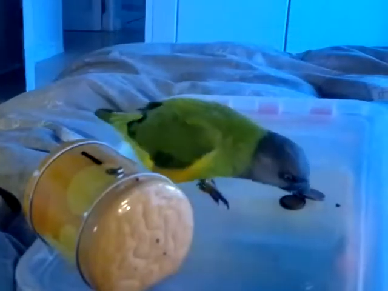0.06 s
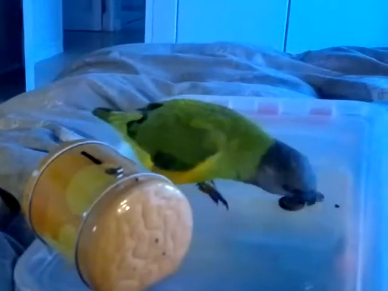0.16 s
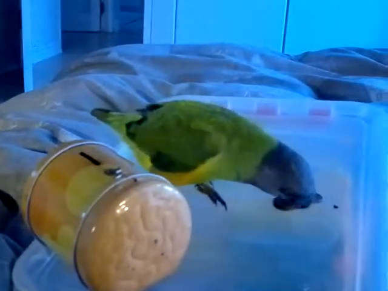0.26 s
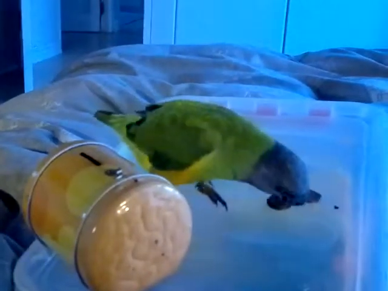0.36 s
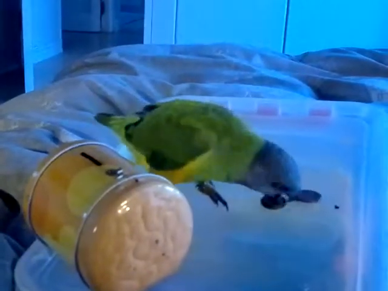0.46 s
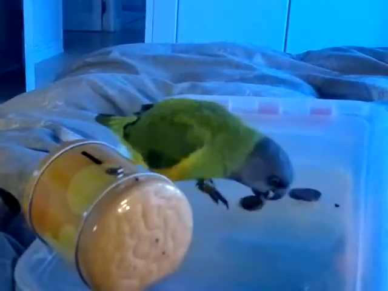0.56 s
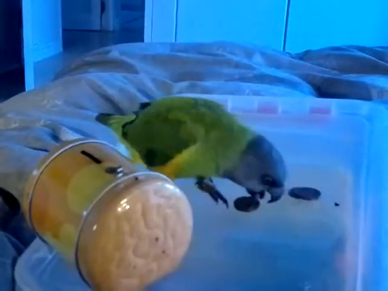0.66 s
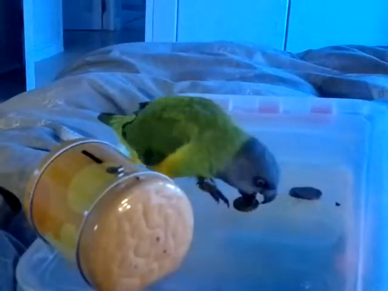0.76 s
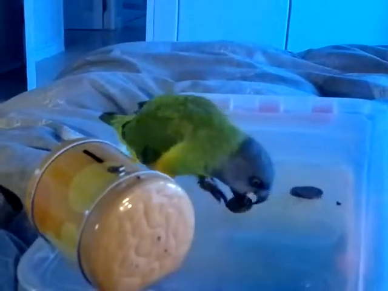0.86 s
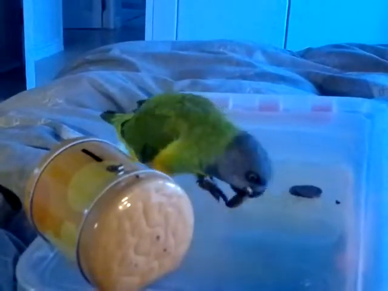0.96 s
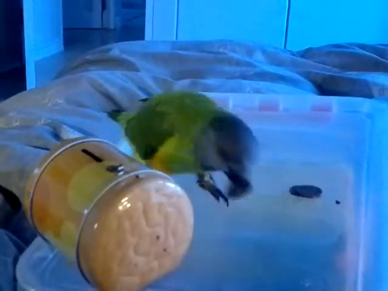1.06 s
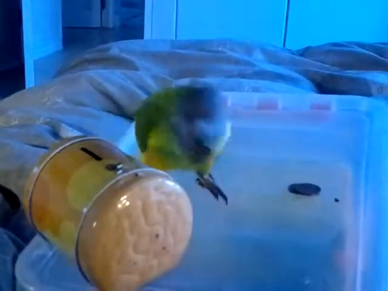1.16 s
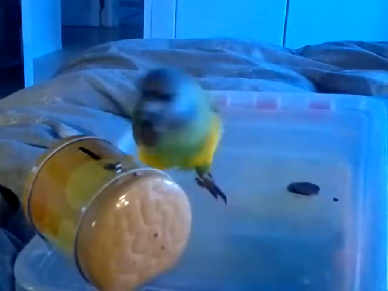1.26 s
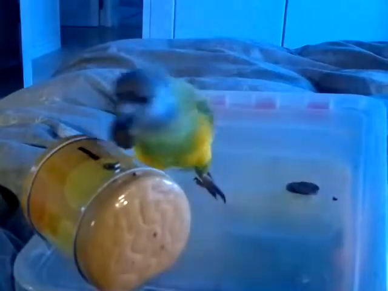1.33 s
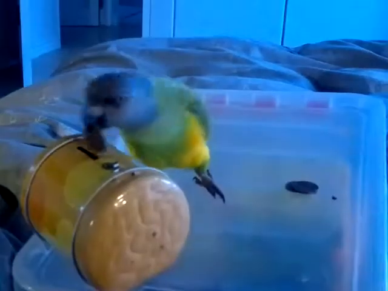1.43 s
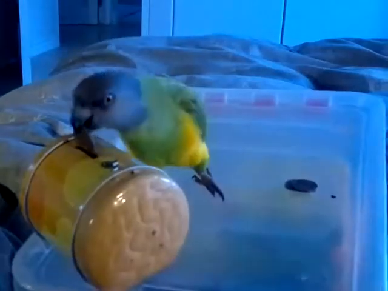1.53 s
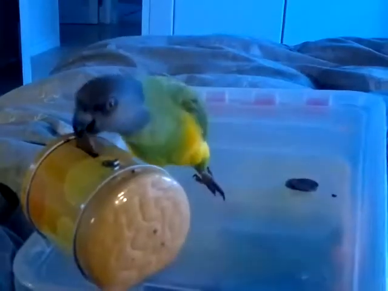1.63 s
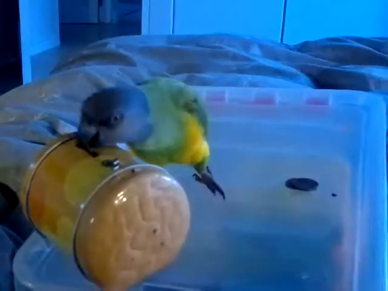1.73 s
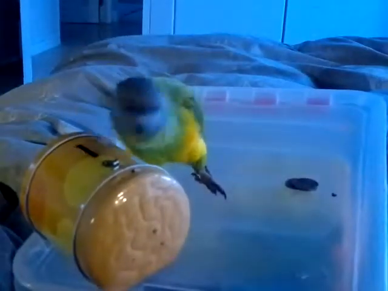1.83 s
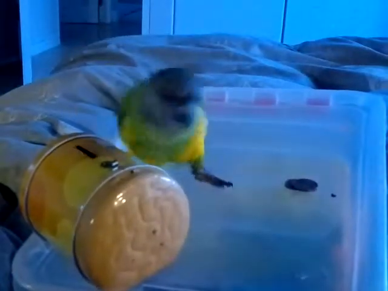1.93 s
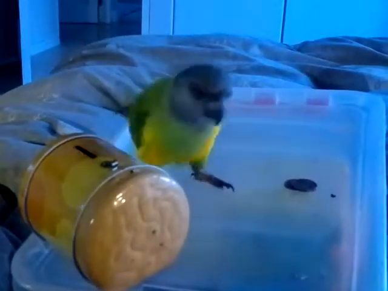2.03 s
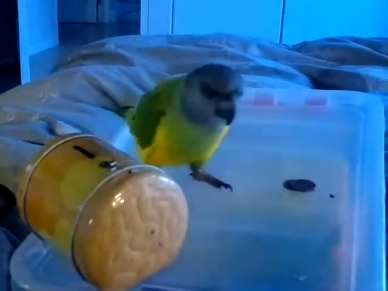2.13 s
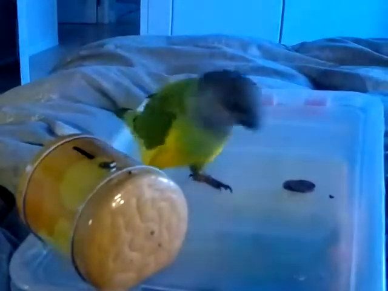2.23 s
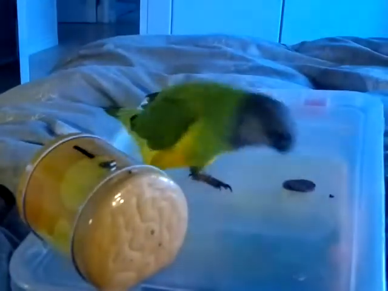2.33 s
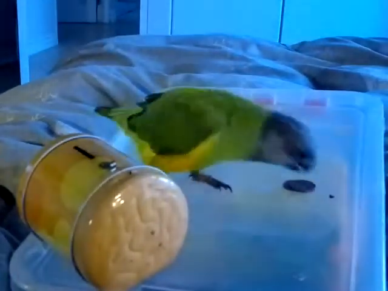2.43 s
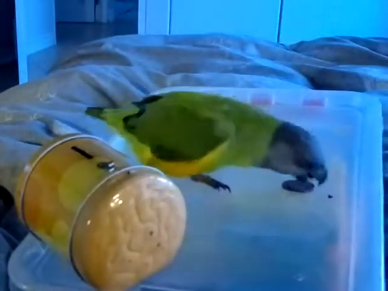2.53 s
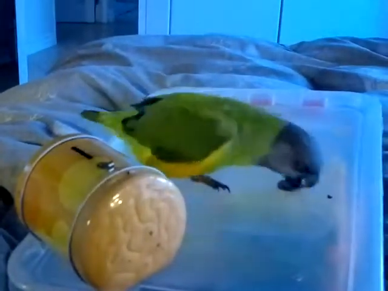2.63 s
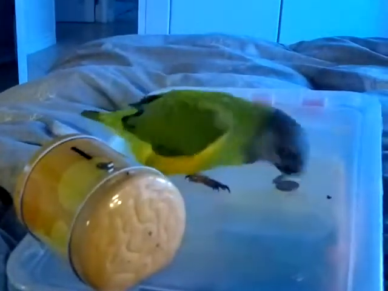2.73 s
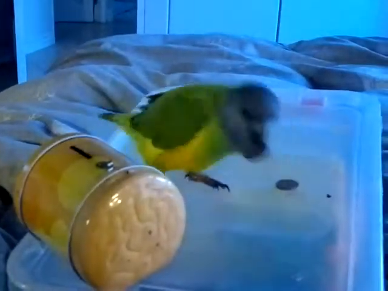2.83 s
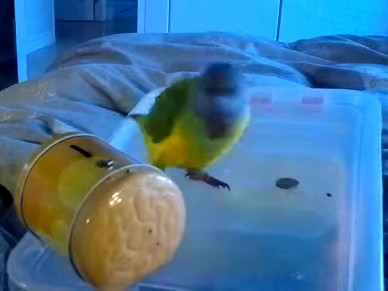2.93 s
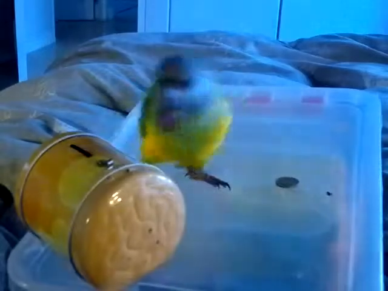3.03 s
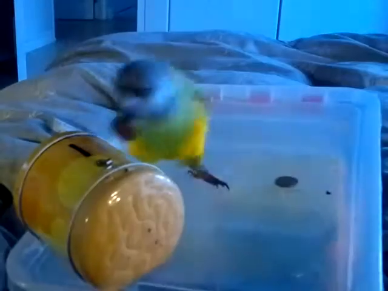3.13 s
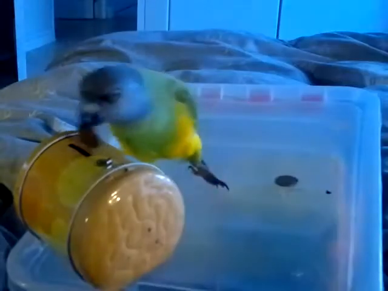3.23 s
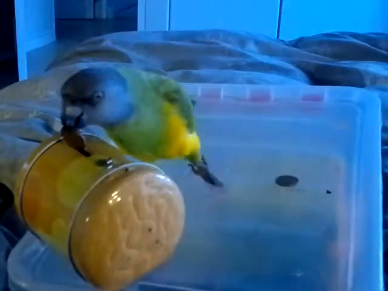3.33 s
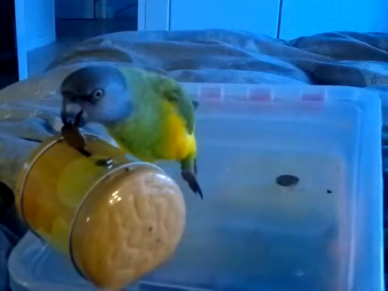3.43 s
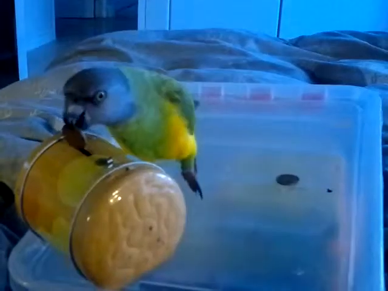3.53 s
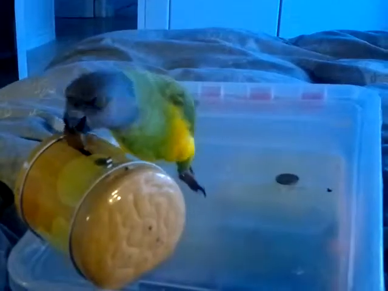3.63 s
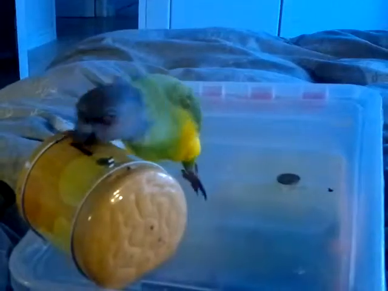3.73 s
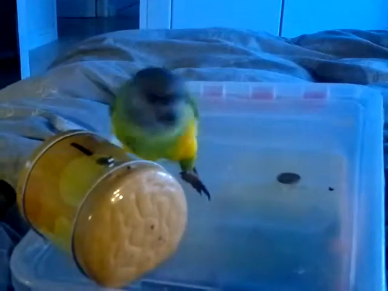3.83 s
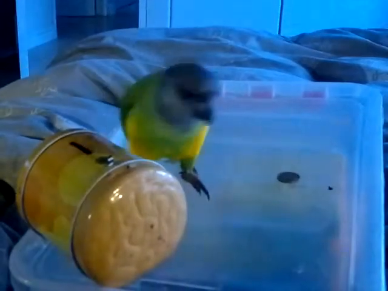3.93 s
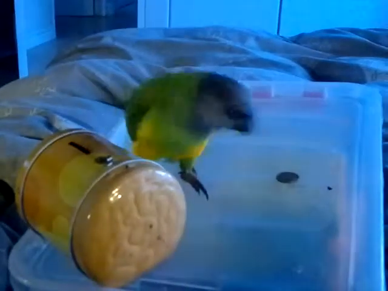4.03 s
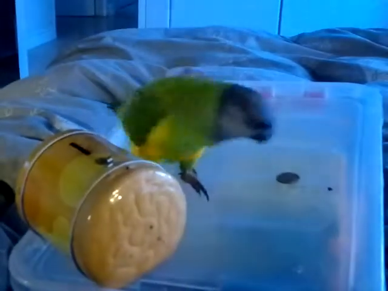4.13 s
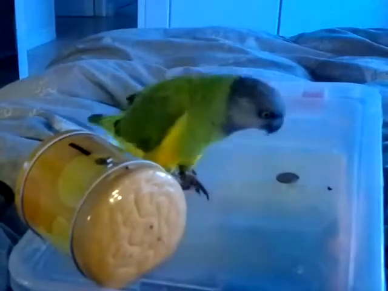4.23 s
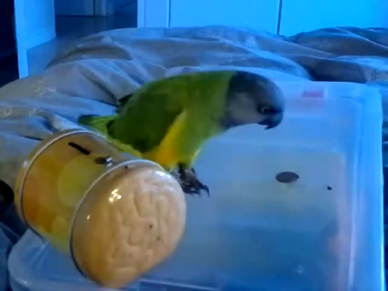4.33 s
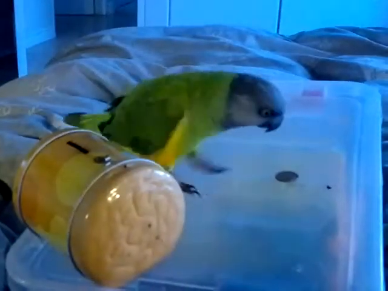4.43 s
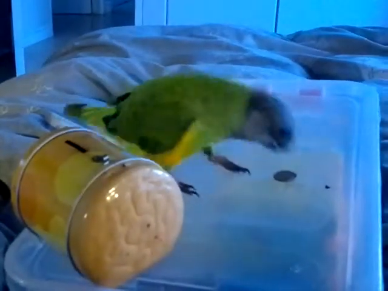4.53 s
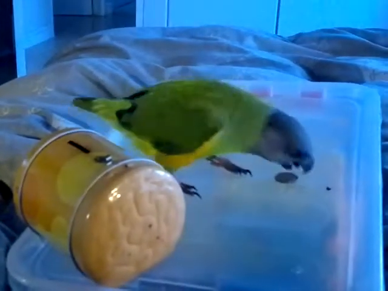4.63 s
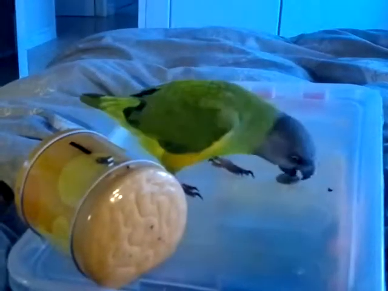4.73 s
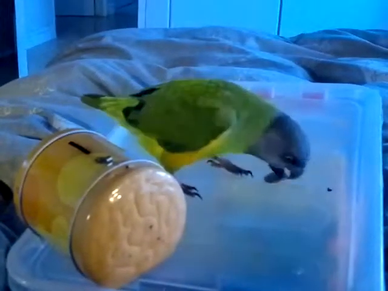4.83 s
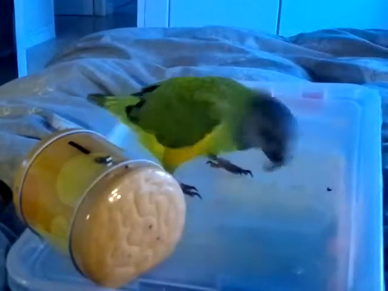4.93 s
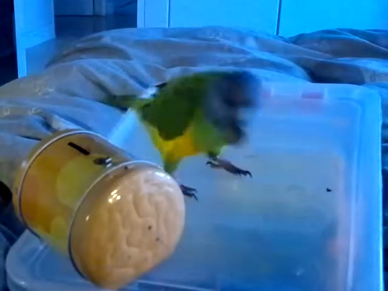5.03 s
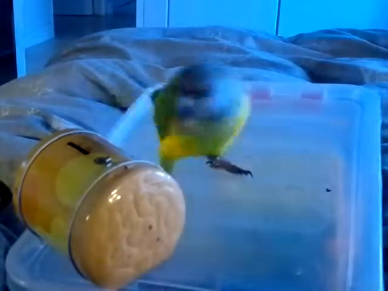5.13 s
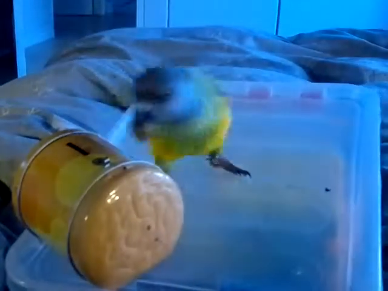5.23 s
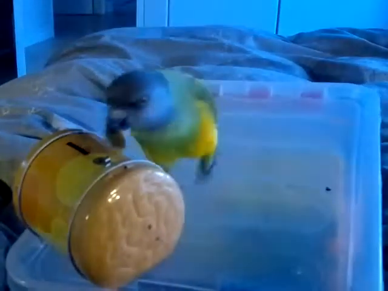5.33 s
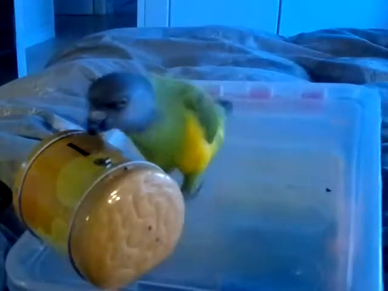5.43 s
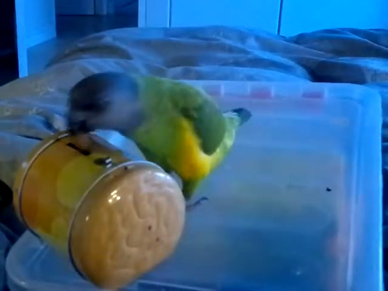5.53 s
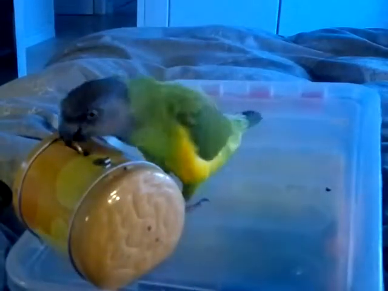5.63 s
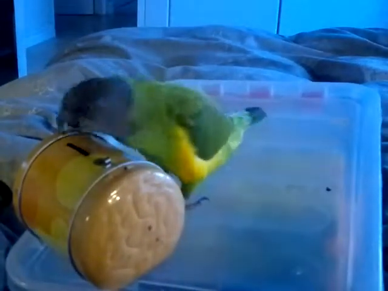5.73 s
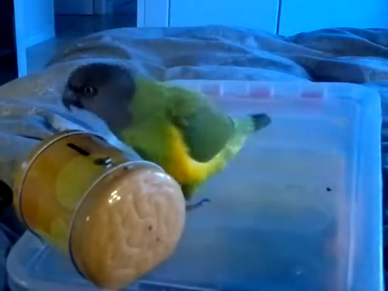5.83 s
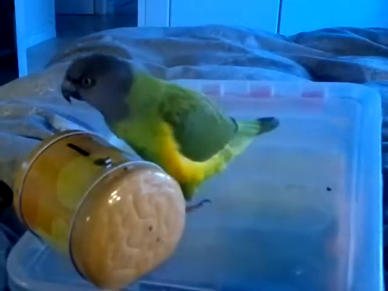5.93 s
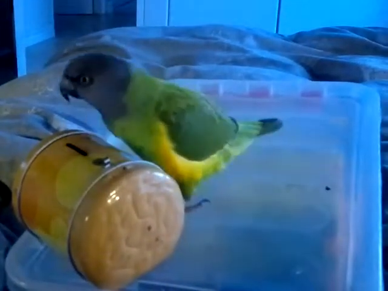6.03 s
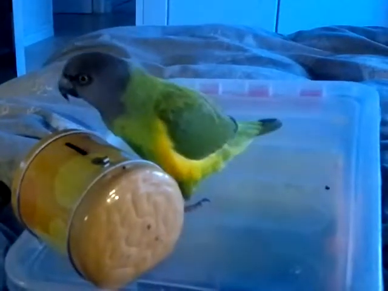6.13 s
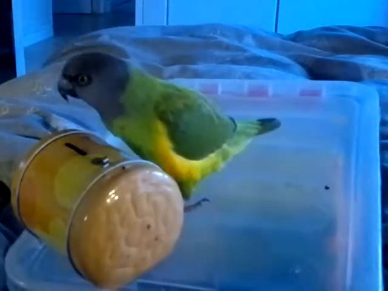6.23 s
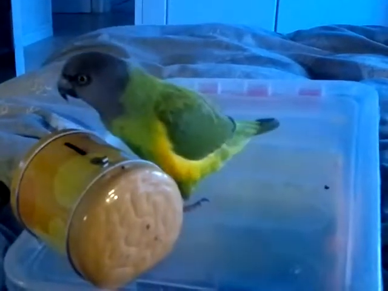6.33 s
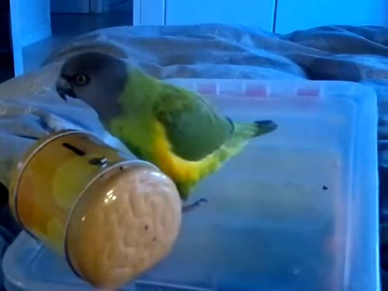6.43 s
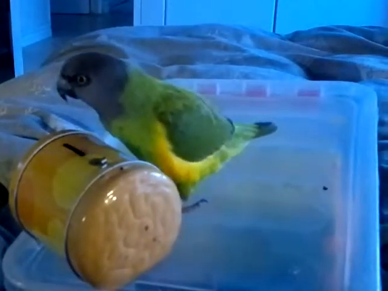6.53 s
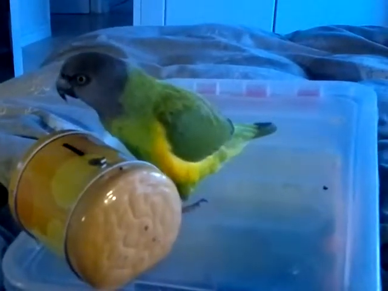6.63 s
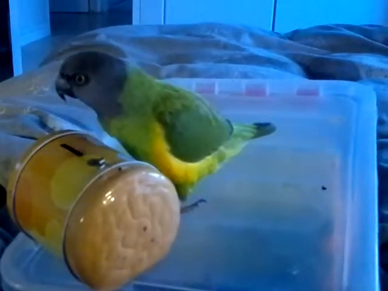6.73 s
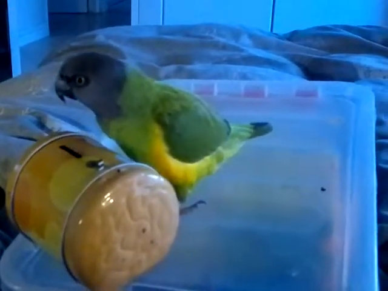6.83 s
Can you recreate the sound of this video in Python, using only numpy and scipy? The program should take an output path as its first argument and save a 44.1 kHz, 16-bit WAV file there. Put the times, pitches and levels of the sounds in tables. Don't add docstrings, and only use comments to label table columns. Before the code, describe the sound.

Close up in a small soft room, a parrot noses a coin over a plastic tub lid with dry clicks and short scrapes. It taps and grinds the coin along a tin's slot in thin bright clinks, then the coin drops and chatters on others over a hollow boom. Two more coins follow, the second pickup nearly silent. Faint hiss and low gusty air, mainly on the left, lie beneath.

```python
import sys
import numpy as np
from scipy import signal
from scipy.fft import rfft, irfft, next_fast_len
from scipy.io import wavfile
from scipy.ndimage import uniform_filter1d

SR = 44100
rng = np.random.default_rng(int(sys.argv[2]) if len(sys.argv) > 2 else 0)


def unload_wav(signal):
    wavfile.write(
        sys.argv[1],
        SR,
        np.round(np.clip(np.atleast_2d(signal).T, -1, 1) * 32767).astype(np.int16),
    )


def ratio_of_db(decibels):
    return 10 ** (np.asarray(decibels, float) / 20)


N = 303408
SPOTS, BLOCK = 16, 256
FADE_DB, LAST = 20, 1.25

# (time [s], level [dB rms])
RUMBLE = [(0.0, -41), (0.09, -49), (0.94, -57), (1.05, -43), (1.38, -54), (1.8, -42), (2.05, -58),
          (2.34, -40.5), (2.37, -51), (3.43, -55), (3.49, -47), (3.7, -59.5), (3.77, -38.5), (3.87, -52.5),
          (4.81, -47), (5.34, -56), (5.36, -46), (6.88, -57.5)]
# (time [s], level [dB rms])
HISS = [(0, -73), (1.2, -75), (2.1, -78.5), (3, -75), (4.2, -72.5), (5.1, -73.5), (6.2, -76.5),
        (6.88, -70.5)]
# (frequency [Hz], density [dB per Hz])
RUMBLE_COLOUR = [(15, -8.5), (30, 5), (60, -3.5), (120, -17.5), (220, -25.5), (400, -41.5), (800, -64.5)]
# (frequency [Hz], density [dB per Hz])
HISS_COLOUR = [(88, -23), (150, -3), (205, -20.5), (235, -5), (398, -14), (1400, -21.5), (2650, -24.5),
               (16000, -39.5)]
# (frequency [Hz], T60 [s], share common to both ports [0-1])
ROOM = [(150, 0.18, 0.8), (600, 0.11, 1), (1500, 0.2, 0.9), (3992, 0.22, 0.05), (9990, 0.14, 0.05)]
# (frequency [Hz], level difference [dB])
LID_BALANCE = [(150, 7), (700, 5), (1200, 1), (1800, 3), (2600, 10), (4400, 17.5), (8100, -10),
               (15000, -18.5)]
# (frequency [Hz], level difference [dB])
TIN_BALANCE = [(100, 3), (400, 1), (700, 2.5), (1300, -1.5), (2400, 4.5), (4400, -0.5), (8100, -13),
               (15000, -21.5)]
# (frequency [Hz], phase lead [rad])
PORT_LEAD = [(20, 0), (1150, 0.62), (1480, -1.6), (1750, -2), (3100, -4.5), (3800, -1), (5200, 3),
             (16000, 16.5)]

# (frequency [Hz], width [Hz], level [dB])
LID_CLICK = [(1631, 400, -2.5), (2262, 450, 4.5), (2940, 650, 1), (3780, 580, -3), (4420, 1000, -12.5)]
# (frequency [Hz], width [Hz], level [dB])
LID_PANEL = [(124, 214, 3.5), (214.3, 11, 4), (242.5, 35, -5.5), (391.4, 12.3, -7.5)]
# (frequency [Hz], width [Hz], level [dB])
LID_SKIN = [(643, 128, 0), (1049, 130, 7), (1530, 980, -3)]
# (frequency [Hz], width [Hz], level [dB])
LID_EDGE = [(5540, 1200, 7.5), (10600, 3100, -11.5)]
# (frequency [Hz], width [Hz], level [dB])
TIN_WALL = [(1659, 540, -6.5), (2095, 630, -4), (2400, 220, -3.5), (2735, 200, -4.5), (3001, 90, -0.5),
            (3240, 200, -2.5), (3627, 250, 2), (3805, 350, -2), (4366, 230, -4), (4898, 540, -8),
            (5470, 700, -10), (5820, 410, -8.5)]
# (frequency [Hz], width [Hz], level [dB])
TIN_DRUM = [(115, 35, -7), (236.2, 84, -10), (415.9, 59, -7), (592, 140, -4.5), (667, 70, 0),
            (721, 90, 2.5), (932, 490, -3), (1182.4, 230, -1.5)]
# (frequency [Hz], width [Hz], level [dB])
TIN_BUMP = [(135, 78, -6.5), (279, 26, -3.5), (410, 15, -9.5)]
# (frequency [Hz], width [Hz], level [dB])
TIN_RIM = [(932, 56, -16.5), (1142, 250, -6.5), (1177, 130, -4.5), (1511, 280, -12)]
# (frequency [Hz], width [Hz], level [dB])
COIN_JINGLE = [(6300, 1900, 7.5), (7405, 700, 0.5), (7600, 320, 1), (9480, 1100, -3), (10250, 700, -2.5),
               (10900, 600, -7.5), (12400, 540, -6.5), (13900, 500, -7), (14800, 690, -6),
               (15800, 600, -14)]

# (time [s], click [dB], weight of the push [dB],
# sharpness [dB])
LID_TAPS = [(0.1047, -63.5, 11, -5), (0.1299, -31, -1, -5), (0.19, -55, 12, 24), (0.197, -42, -9, -38),
            (0.2047, -27.5, -16, -46), (0.26, -72, 0, -5), (0.2918, -23.5, -11, 14),
            (0.3034, -18, -25, -13), (0.3094, -18, -9, -25), (0.3264, -45, -7, -24),
            (0.3494, -30, -26.5, -53), (0.4229, -49, 6, -35), (0.4362, -20.5, -14.5, -8),
            (0.4835, -24.5, -23, -30), (0.4985, -24.5, -21, -30), (0.5246, -44.5, 0, -39),
            (0.628, -40, 6, 11), (0.6597, -38.5, 1, -30), (0.7788, -41, 5.5, -40),
            (0.8304, -48.5, 3, -22), (0.8855, -49, -8, -25.5), (0.9174, -66, -17, -20),
            (2.487, -51.5, 1.5, -13.5), (2.506, -31, -1, 18.5), (2.5197, -34.5, -3, -39),
             (2.529, -24, -10.5, -39), (2.544, -33, -30, -32), (2.5554, -29, -27, -35.5),
             (2.562, -25, -33, -41), (2.589, -35, -3, -28), (2.5999, -18.5, -13.5, -15),
             (2.6041, -24, -7.5, -35.5), (2.6248, -23.5, -10, -32), (2.6288, -12.5, -31, -32),
             (2.6367, -20.5, -28, -35), (2.6395, -29, -27.5, -42), (2.962, -49.5, -34.5, 18),
             (4.477, -44, -33.5, 0), (4.6498, -44.5, 16, -10.5), (4.6535, -27.5, -13.5, 12),
             (4.6717, -46.5, 17.5, -36), (4.7683, -32, -20.5, -46), (4.84, -48, -18, -25.5),
             (3.488, -56.5, -25, -25.5), (5.172, -54.5, -15.5, -21)]
# (peak time [s], fade [s], rasp [dB rms], weight [dB], sharpness [dB])
LID_DRAGS = [(.19, 0.036, -50.5, 0, -25), (.206, 0.04, -48, -3.5, -36), (.308, 0.054, -36, -14.5, -6),
             (.38, 0.068, -65, 20, -30), (.42, 0.056, -55.5, 6, -30), (.45, 0.13, -47, 8, -53),
             (.497, 0.033, -44, -2.5, -52), (.634, 0.024, -61.5, 21.5, -6), (.666, 0.063, -66.5, 25.5, -23),
             (.762, 0.028, -54.5, -2, -33), (.782, 0.023, -59, 20, -34), (.9, 0.022, -66.5, 12, -24),
             (2.515, 0.39, -60, 5.5, -14), (2.552, 0.011, -43, -11, -30), (2.606, 0.06, -42, 5, -13),
             (2.638, 0.011, -44.5, -4, -9), (4.662, 0.11, -60.5, 11, -11.5),
             (4.772, 0.037, -48.5, -11.5, -50), (4.79, 0.018, -63, -3, -49), (4.815, 0.028, -61, -4, -51)]
# (time [s], clink [dB], weight [dB], sharpness [dB])
SLOT_TAPS = [(1.2975, -25, -6.5, -7.5), (1.3173, -18, -30, -24.5), (1.4061, -33.5, -31, -26),
             (1.4305, -16.5, -31, -22), (1.4424, -12, -33, -17), (1.5549, -10, -29, -29),
             (1.5699, -21.5, -16, -26.5), (1.5913, -36, -37.5, -32), (1.643, -9, -28.5, -30.5),
             (1.6576, -17, -35.5, -22.5), (3.1317, -22, -18, -12.5), (3.1481, -17.5, -35.5, -26.5),
             (3.247, -10, -37, -18.5), (3.3136, -31, -21, -25), (3.4081, -46.5, -9, -30.5),
             (3.57, -11, -45, -20.5), (3.5848, -34.5, -38, -25.5), (3.6083, -6.5, -38.5, -19),
             (3.6416, -22, -44.5, -29.5), (5.2453, -43, -40, -2), (5.3068, -21.5, -30, -17),
             (5.3202, -20, -42, -15), (5.3787, -37, -23.5, -49), (5.5181, -19, -66.5, -14.5),
             (5.531, -13, -59, -12.5), (5.6101, -16.5, -45, -39), (5.6283, -17.5, -37.5, -26.5),
             (5.6446, -23.5, -45.5, -14.5), (6.1587, -37.5, -21.5, -15), (6.1764, -40.5, -28, -41),
             (1.324, -15.5, -35, -24.5), (1.332, -29.5, -27, -23), (1.456, -23.5, -41, -19.5),
              (1.465, -22, -37, -21.5), (1.52, -36.5, -18, -37), (1.536, -23, -39, -37.5),
              (1.544, -20.5, -43, -33), (1.56, -13, -37, -29.5), (1.581, -21, -37, -14.5),
              (1.603, -20, -38, -20), (1.63, -19, -48, -24), (1.647, -9, -31.5, -19.5),
              (1.6572, -10.5, -40, -21), (3.159, -23, -26.5, -26), (3.175, -30.5, -11, -30.5),
              (3.187, -33.5, -28, -35), (3.263, -19, -43, -9), (3.562, -24.5, -31, -19.5),
              (3.602, -19, -40, -19.5), (5.326, -25, -39, -16.5), (5.335, -37, -40, -21),
              (5.357, -36, -38, -29), (5.394, -38.5, -36, -33.5), (5.407, -35.5, -32, -44),
              (5.418, -33.5, -24, -42), (5.485, -47, -14, -30), (5.537, -16.5, -55, -21),
              (5.546, -27, -72, -22), (5.638, -18.5, -40, -26), (5.659, -26.5, -39, -20.5)]
# (peak time [s], fade [s], grind [dB rms], weight [dB], sharpness [dB])
SLOT_GRINDS = [(1.545, 0.082, -28, -36, -33), (1.574, 0.13, -23.5, -30, -13.5),
               (1.656, .035, -21.5, -22, -9.5), (3.175, 0.038, -42, 0, -37.5),
               (3.235, 0.024, -40, -14, -17.5), (3.572, 0.13, -23.5, -33, -16.5),
               (3.638, 0.026, -20, -25, -10), (5.338, 0.11, -37, -20, -43.5),
               (5.4, 0.032, -35, -8.5, -56.5), (5.622, 0.069, -32.5, -32, -32.5),
               (5.647, 0.014, -22.5, -25, -13)]
# (time [s], clink
# [dB], weight [dB], sharpness [dB])
TIN_HITS = [
    (1.7428, -3.5, -13.5, -14.5),
    (1.8255, -6.5, -4, -11.5),
    (3.7571, -8, -9.5, -9),
    (3.9, -18, -9.5, -14.5),
    (4.012, -18.5, -6.5, -16),
    (4.0475, -18.5, -3.5, -12),
    (5.7415, -8.5, -12.5, -11.5),
    (5.8085, -5, -7.5, -7.5),
    (5.9329, -5.5, -18, -9.5),
            (1.7483, -5, -20.5, -21.5), (1.7577, -2.5, -6, -10.5), (1.7679, -10.5, -11.5, -5),
                 (1.7791, -8, -14.5, -9), (1.7871, -6, -15.5, -8), (1.7956, -9.5, -10, -7),
                 (1.808, -5, -18.5, -13.5), (1.8125, -5.5, -13, -16), (1.8308, -11, -2.5, -10.5),
                 (1.8414, -13.5, -13, -10), (1.863, -13, -9, -14), (1.8752, -20.5, -5.5, -11),
                 (1.8915, -14.5, -12.5, -11.5), (1.8982, -11.5, -12, -14), (1.9092, -13.5, -11.5, -7),
                 (1.9164, -14.5, -13.5, -9.5), (1.9286, -21.5, -11.5, -9), (1.9439, -18.5, -9.5, -6),
                 (1.9518, -15, -9.5, -8.5), (1.964, -27, -10.5, -9.5), (1.9714, -30.5, -5.5, -13),
                 (1.9788, -25.5, -19.5, -13.5), (1.9869, -24.5, -10, -15.5), (1.9944, -28.5, -7, -15),
            (3.7421, -5.5, -9, -9), (3.7547, -10, -10, -10.5), (3.759, -2, -3, -9.5),
                  (3.7687, -11.5, -7, -6.5), (3.7786, -9.5, -10.5, -4.5), (3.7985, -14.5, -5.5, -6.5),
                  (3.8079, -4, -9.5, -3), (3.8226, -12.5, -9.5, -11), (3.8314, -4.5, -17.5, -11),
                  (3.8384, -8, -15, -9), (3.8499, -14, -8.5, -14), (3.874, -12.5, -4, -10),
                  (3.8813, -12, -12.5, -16), (3.905, -9, -11, -20.5), (3.9118, -16, -4.5, -12),
                  (3.9227, -13, -17, -5), (3.9536, -13, -11, -18), (3.963, -13.5, -20, -17),
                  (3.9895, -21, -15, -19.5), (4.0008, -26.5, -15, -30), (4.0154, -3.5, -15.5, -11.5),
                  (4.0536, -18, -14.5, -5), (4.0614, -23, -12.5, -9), (4.0754, -17.5, -13, -10),
                  (4.0858, -20.5, -21.5, -16),
            (5.7449, -7.5, -5.5, -12.5), (5.7513, -13.5, -6, -10.5), (5.762, -7.5, -5, -10),
                 (5.7757, -10, -7, -8.5), (5.7857, -6, -11, -12), (5.7954, -8, -7.5, -10),
                 (5.817, -6.5, -11.5, -3), (5.8328, -13.5, -15.5, -4.5), (5.8496, -9, -12.5, -12.5),
                 (5.8578, -18.5, -9, -10.5), (5.8944, -30.5, -6.5, -12.5), (5.908, -32, -7.5, -15.5),
                 (5.9167, -35, -4, -12), (5.9393, -8, -15.5, -13.5), (5.9501, -12.5, -12, -10),
                 (5.964, -18.5, -13.5, -7), (5.9711, -12, -14.5, -14), (5.9776, -23.5, -18.5, -9),
                 (6.019, -30, -11, -11.5), (6.0255, -24, -15, -9.5), (6.0344, -30.5, -14, -11.5)]
# (peak time [s], fade [s], rattle [dB rms], weight [dB])
TIN_RATTLES = [(1.746, 0.038, -17, 7), (1.787, 0.11, -13, -21), (1.813, 0.19, -15.5, -9.5),
               (3.746, 0.12, -12.5, -18.5), (3.81, .16, -15, -12), (3.876, 0.14, -21, -8),
               (3.955, 0.028, -28.5, -8), (4.013, 0.028, -5, -19.5), (4.03, 0.11, -19.5, -6),
               (5.746, 0.023, -18, 5.5), (5.757, 0.13, -8.5, -10), (5.848, 0.04, -17, -19.5),
               (5.94, 0.0087, -12, -5.5), (5.956, 0.11, -20.5, -13.5)]


def on_log(table, hz, axis=1):
    t = np.array(table, float)
    return np.interp(np.log(hz + 1), np.log(t[:, 0]), t[:, axis])


def coloured(colour, size):
    gain = ratio_of_db(on_log(colour, np.fft.rfftfreq(size, 1 / SR)))
    x = irfft(rfft(rng.standard_normal(size)) * gain, size)
    return x / np.sqrt(np.mean(x ** 2))


def walk(rate):
    k = int(SR / rate)
    held = np.repeat(rng.standard_normal(N // k + 1), k)
    return 0.7 * uniform_filter1d(uniform_filter1d(held, k), k)[:N]


def floor():
    t = np.arange(N) / SR
    gust = ratio_of_db(np.interp(t, *np.transpose(RUMBLE)) + 4.3 * walk(26))
    left, other = coloured(RUMBLE_COLOUR, N), coloured(RUMBLE_COLOUR, N)
    rumble = gust * np.array([ratio_of_db(4.0) * left, ratio_of_db(-23) * left + ratio_of_db(-21.0) * other])
    hiss = np.array([coloured(HISS_COLOUR, N), coloured(HISS_COLOUR, N)])
    return rumble + hiss * ratio_of_db(np.interp(t, *np.transpose(HISS)) + 3.5)


def room(cut_s):
    count, gap_s, early = 4, 0.0031, 0.94
    t = np.arange(9000) / SR
    out = 0
    for hz in 90 * 2. ** np.arange(8):
        sos = signal.butter(2, [hz / 1.42, hz * 1.42], "bandpass", fs=SR, output="sos")
        common, left, right = signal.sosfilt(sos, rng.standard_normal((3, count, len(t))))
        share = np.clip(on_log(ROOM, hz, axis=2), 0, 1)
        fade = np.exp(-np.log(1000) * t / on_log(ROOM, hz) - (t / cut_s) ** 4)
        out = out + fade * (np.sqrt(share) * common + np.sqrt(1 - share) * np.array([left, right]))
    out = out * np.interp(t, [0, .002, gap_s, gap_s + 0.0016], [0, early, early, 1])
    return out / np.sqrt(np.mean(np.sum(out ** 2, axis=2)))


def ports(x, balance):
    size = next_fast_len(x.shape[-1])
    hz = np.fft.rfftfreq(size, 1 / SR)
    lead = np.interp(hz, *np.transpose(PORT_LEAD))
    half = ratio_of_db(on_log(balance, hz) / 2) * np.exp(.5j * lead)
    return irfft(rfft(x, size) * np.array([half, 1 / half]), size)[:, :x.shape[-1]]


def heard(x, walls, wet_db, balance):
    place = np.repeat(rng.integers(0, walls.shape[1], N // BLOCK + 1), BLOCK)[:N]
    at_place = 1. * (place == np.arange(walls.shape[1])[:, None])
    share = uniform_filter1d(at_place, size=200, axis=1)
    size = next_fast_len(N + walls.shape[2])
    sent = rfft(share * x.mean(axis=0), size)
    wet = irfft(np.sum(sent * rfft(walls, size), axis=1), size)[:, :N]
    return ports(x + ratio_of_db(wet_db) * wet, balance)


def reduced(x):
    gate_db, tilt_db_per_octave, steep = -93, -3.0, 0.93
    hz, _, z = signal.stft(x, SR, nperseg=256)
    power = uniform_filter1d(np.abs(z) ** 2, size=5, axis=1)
    power = uniform_filter1d(power, size=5, axis=2)
    octaves = np.log2(np.clip(hz, 400, 6000) / 3000)
    limit = ratio_of_db(2 * (gate_db + tilt_db_per_octave * octaves))[:, None]
    gain = np.abs(power / (power + limit)) ** steep
    return signal.istft(z * gain, nperseg=256)[1][:, :N]


def ring(modes, spot_db, side_db, detune, count):
    hz, width, db = np.transpose(modes)[:, None, None, :, None]
    u = rng.standard_normal((count, 4, len(modes), 1))
    t = np.arange(3072) / SR
    gain = ratio_of_db(db + spot_db * u[:, :1] + side_db * np.minimum(hz / 3000, 1) * u[:, 1:3])
    sign = (-1.) ** np.arange(len(modes))[:, None]
    swell = (1 - np.exp(-t * hz / 0.22)) ** 2
    fade = sign * width * np.exp(-np.pi * width * t) * swell
    tone = np.sin(2 * np.pi * hz * (1 + detune * u[:, 3:]) * t)
    return np.sum(gain * (fade * tone), axis=2)


def blows(events, chatter_s, chatter_db, first=0.51):
    s, db, *rel_db = np.transpose(events)
    u = rng.random((len(s), 2, 10))
    late = -chatter_s * np.log(1 - .98 * u[:, 0])
    size = ratio_of_db(chatter_db) * np.exp(-late / chatter_s / 2) * (2 * u[:, 1] - 1)
    late[:, 0], size[:, 0] = 0, first
    index = ((s[:, None] + late) * SR).astype(int)
    force = np.zeros((len(rel_db) + 1, N))
    for part, part_db in zip(force, [db] + [db + r for r in rel_db]):
        np.add.at(part, index, size * ratio_of_db(part_db)[:, None])
    return force


def slides(rows, rise_s, per_s, scatter_db, patchy_db):
    ticks = (rng.random(N) < per_s / SR) * rng.standard_normal(N)
    ticks = ticks * ratio_of_db(scatter_db * np.minimum(rng.exponential(size=N), 3.5))
    ticks = ticks * ratio_of_db(patchy_db * walk(150))
    power, t = np.zeros((len(rows[0]) - 2, N)), np.arange(N) / SR
    pace = np.append(np.ones(len(power) - 1), 1.8)[:, None]
    for s, fade_s, db, *rel_db in rows:
        on = (t > s - LAST * rise_s) & (t < s + LAST * fade_s)
        shape_db = -FADE_DB * np.maximum((s - t[on]) / rise_s, (t[on] - s) / fade_s)
        family_db = db + np.array([0, *rel_db])[:, None]
        power[:, on] += ratio_of_db(2 * (family_db + pace * shape_db))
    return np.sqrt(power) * ticks / np.sqrt(np.mean(ticks ** 2))


def struck(hit, slid, parts, hit_db, slide_db, spot_db, side_db, detune):
    blocks, size = N // BLOCK, 14 * BLOCK
    spot = rng.integers(0, SPOTS, blocks)
    in_blocks = (hit[0] + slid[0])[:blocks * BLOCK].reshape(blocks, BLOCK)
    busy = np.flatnonzero(np.any(in_blocks, axis=1))
    spectrum = 0
    for h, s, modes, h_db, s_db in zip(hit, slid, parts, hit_db, slide_db):
        r = ring(modes, spot_db, side_db, detune, count=SPOTS)
        r = r / np.mean(np.max(np.abs(r), axis=2), axis=1)[:, None, None]
        force = ratio_of_db(h_db) * h + ratio_of_db(s_db) * s / np.sqrt(np.mean(np.sum(r ** 2, axis=2)))
        force = force[:blocks * BLOCK].reshape(blocks, BLOCK)[busy]
        spectrum = spectrum + rfft(force, size)[:, None] * rfft(r, size)[spot[busy]]
    out = np.zeros((2, N + size))
    for block, sound in zip(busy, irfft(spectrum, size)):
        out[:, block * BLOCK:block * BLOCK + size] += sound
    return out[:, :N]


def weighted(rows, base_db, share):
    *head, weight_db, sharp_db = np.transpose(rows)
    return np.transpose([*head, weight_db, base_db + share * weight_db, sharp_db])


def jingling(rows, share):
    *head, db, weight_db = np.transpose(rows)
    return np.transpose([*head, db, weight_db, -share * db])


def lid(walls):
    taps = blows(weighted(LID_TAPS, 1.6, 0.52), chatter_s=0.0032, chatter_db=-9.0)
    drags = slides(weighted(LID_DRAGS, 2.84, 0.48), rise_s=0.01, per_s=3500, scatter_db=2.5, patchy_db=3.2)
    x = struck(taps, drags, (LID_CLICK, LID_PANEL, LID_SKIN, LID_EDGE),
               hit_db=(-1.0, 2.5, -3.5, -28.5), slide_db=(-4.0, -9.0, 0.0, -2.0),
               spot_db=0.77, side_db=3.0, detune=0.023)
    return heard(x, walls, -8.0, LID_BALANCE)


def tin_slot():
    taps = blows(weighted(SLOT_TAPS, -1.5, 0.36), chatter_s=0.0046, chatter_db=-1.5, first=0.35)
    grinds = slides(weighted(SLOT_GRINDS, -9, 0.26), rise_s=.026, per_s=2900, scatter_db=3.9, patchy_db=3.7)
    return struck(taps, grinds, (TIN_WALL, TIN_BUMP, TIN_RIM, COIN_JINGLE),
                  hit_db=(-2.5, -1.0, -5.5, -1.5), slide_db=(-4.5, -8.0, -3.0, -3.5),
                  spot_db=2.3, side_db=3.8, detune=0.03)


def tin_pile():
    landings = TIN_HITS
    hits = blows(landings, chatter_s=.0018, chatter_db=-4.5)
    rattles = slides(jingling(TIN_RATTLES, 0.032), rise_s=0.0062, per_s=2200, scatter_db=2.2, patchy_db=0.82)
    return struck(hits, rattles, (TIN_WALL, TIN_DRUM, COIN_JINGLE),
                  hit_db=(3.5, 2.0, -7), slide_db=(-13, -17, -16), spot_db=0.82, side_db=4.9, detune=.015)


def tin(walls):
    return heard(tin_slot() + tin_pile(), walls, -3.0, TIN_BALANCE)


def scene():
    sources = lid(room(cut_s=0.033)) + tin(room(cut_s=.072))
    return reduced(sources) + floor()


def top_cut(x):
    return signal.sosfilt(signal.butter(12, 15900, fs=SR, output="sos"), x)


def record(dry):
    rounded = .9 * np.tanh(1.3 * dry)
    low_pass = signal.ellip(8, .2, 80, 15600, fs=SR, output="sos")
    mix = signal.sosfilt(low_pass, rounded)
    return top_cut(mix)


dry = scene()
out = record(dry)
unload_wav(out)
```